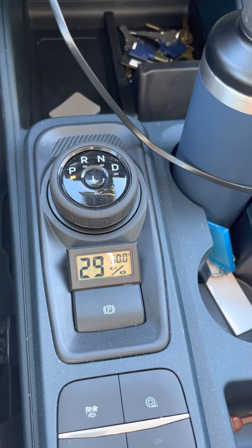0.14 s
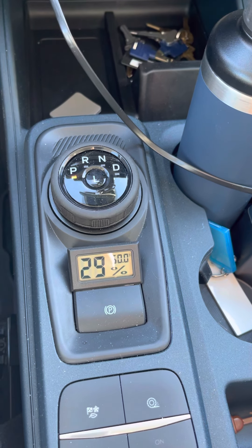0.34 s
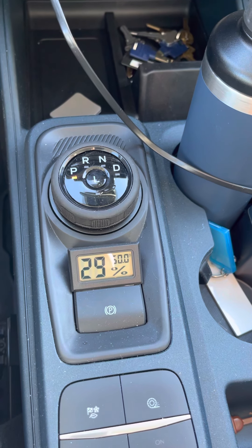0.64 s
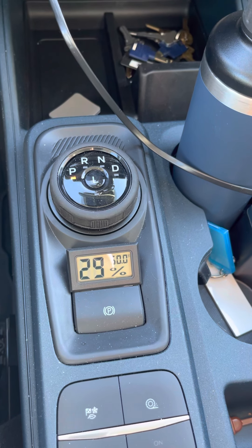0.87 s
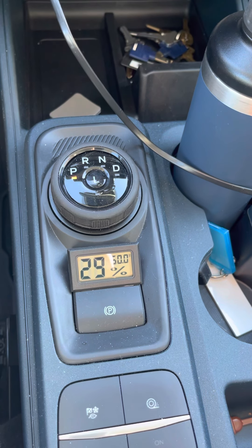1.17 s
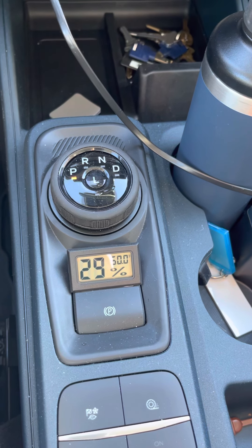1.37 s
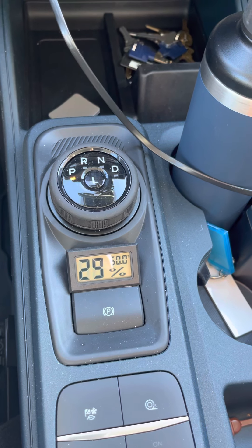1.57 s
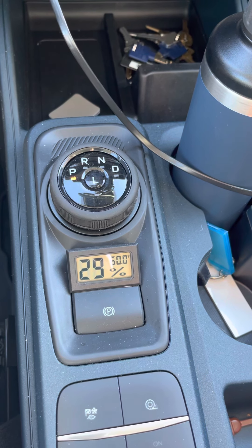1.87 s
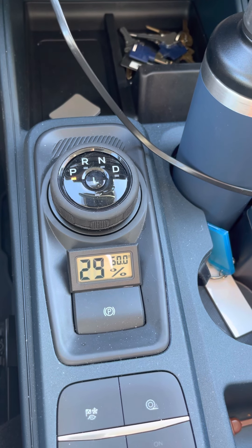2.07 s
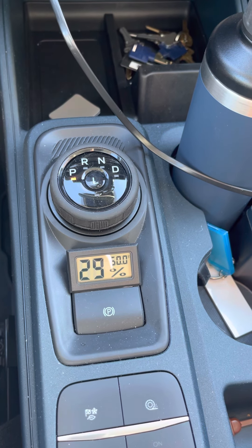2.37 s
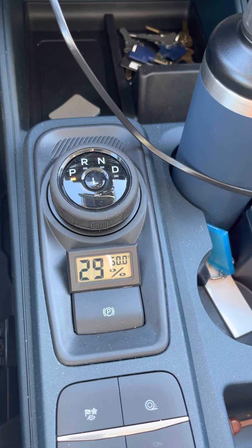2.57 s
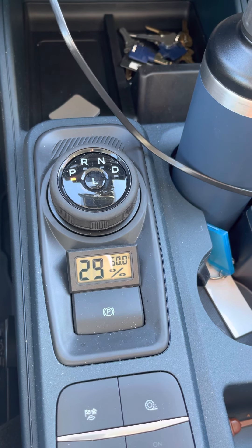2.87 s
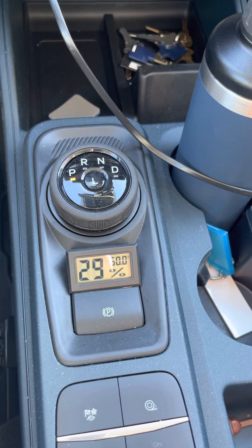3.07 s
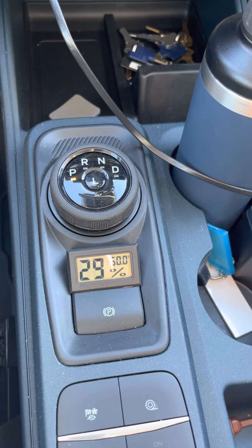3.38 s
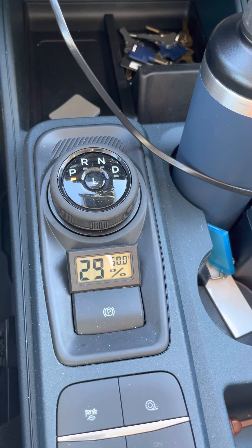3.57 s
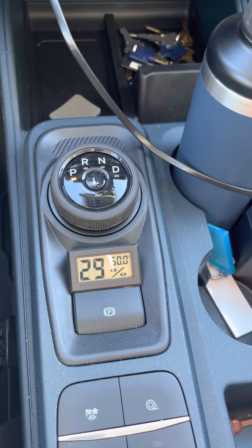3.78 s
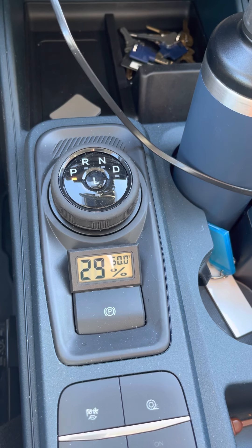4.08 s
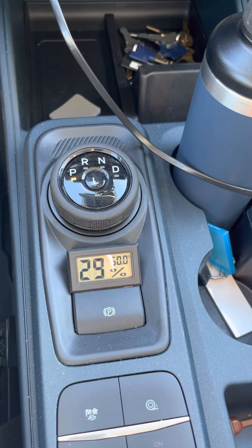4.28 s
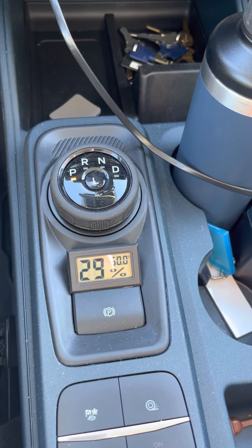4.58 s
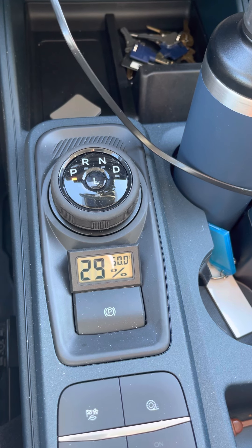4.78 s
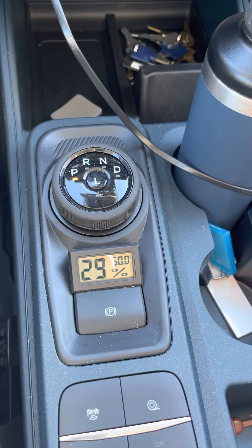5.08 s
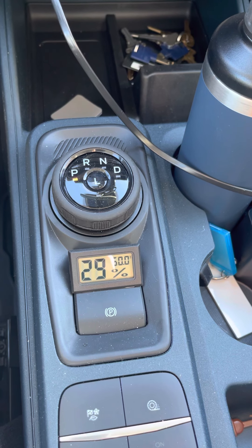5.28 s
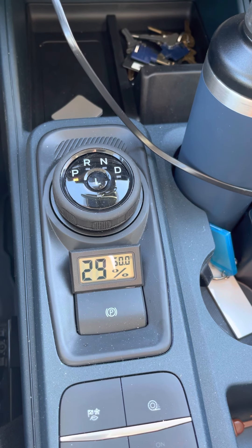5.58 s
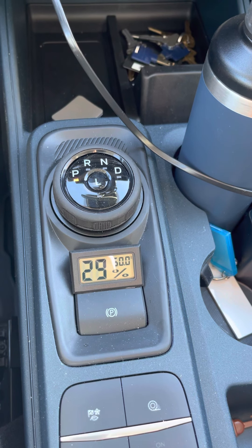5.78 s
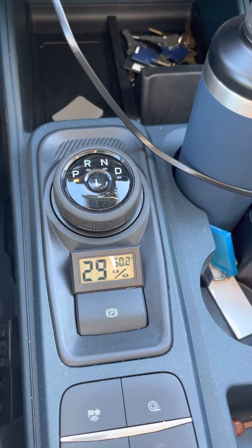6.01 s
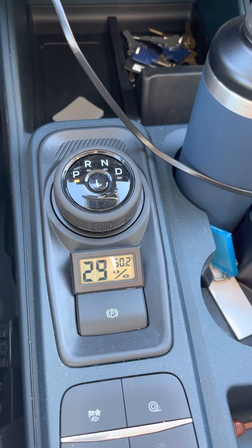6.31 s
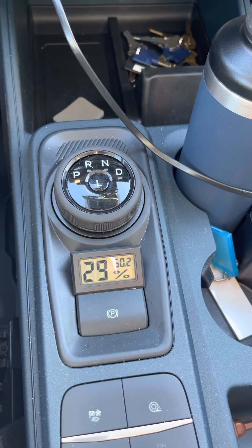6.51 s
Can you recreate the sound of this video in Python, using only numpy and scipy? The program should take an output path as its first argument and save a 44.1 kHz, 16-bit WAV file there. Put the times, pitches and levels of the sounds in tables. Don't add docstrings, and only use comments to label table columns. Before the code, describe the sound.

A constant, gusty vent roar fills a small car interior, coloured by duct resonances, dull in the extreme treble. A sharp plastic snap sets panels booming briefly and small metal parts tinkling. Afterwards a low engine hum swells quickly with a faint intake growl, then drifts down in pitch; a light tick follows, and another slightly higher rev. Picked up by a phone near the centre console.

```python
import sys
import numpy as np
from scipy import signal
from scipy.fft import rfft, irfft
from scipy.io import wavfile
from scipy.ndimage import uniform_filter1d

SR = 44100
rng = np.random.default_rng(int(sys.argv[2]) if len(sys.argv) > 2 else 0)


def transcribe(signal):
    frames = np.atleast_2d(signal).T
    limited = np.clip(frames, -1, 1)
    pcm = np.round(limited * 32767).astype(np.int16)
    wavfile.write(sys.argv[1], SR, pcm)


def ratio_of_db(decibels):
    return 10 ** (np.asarray(decibels, float) / 20)


N = 293265
T = np.arange(N) / SR
F = np.maximum(np.arange(N // 2 + 1) * SR / N, 1)

# (throttle opens [s], top firing rate [Hz], coasting from [s], boom level [dB])
REVS = [
    (1.553, 102.9, 2.02, 0),
    (4.55, 122, 5.01, 0.5),
]
IDLE_HZ, CLIMB_HZ_PER_S, COAST_PER_S = 48.9, 225, 0.545
LEAD_IN_S, LATCH_S, TICK_S = 0.18, 0.513, 4.1905


def on_log(table, column=1):
    table = np.array(table)
    return np.interp(np.log(F), np.log(table[:, 0]), table[:, column])


def walk(rate):
    hold = int(SR / rate)
    steps = np.repeat(rng.standard_normal(N // hold + 1), hold)
    return 1.41 * uniform_filter1d(uniform_filter1d(steps, hold), hold)[:N]


def noise(db_per_hz):
    return rfft(rng.standard_normal((2, N))) * ratio_of_db(db_per_hz) * np.sqrt(SR / 2)


def blower():
    # (frequency [Hz], density [dB per Hz])
    rush = [(40, -100), (130, -62.5), (170, -64), (370, -60.5), (430, -66.5), (570, -70), (1300, -74),
            (1600, -78), (2400, -81.5), (2750, -87.5), (4400, -91), (4800, -92), (7500, -98.5),
            (11000, -101)]
    # (frequency [Hz], width [Hz], level over the rush [dB])
    duct = [(247.4, 58.6, 8.5), (302.4, 32, 3.5), (403, 21.7, -10), (563, 40, -4.5), (699.5, 58, 7),
            (758, 73, -4), (990, 88, 2.5), (1002, 29, 0), (1108, 88, 4), (1190, 55, 2.5), (1297, 43, -3),
            (1482, 22, 4.5), (1530, 50, -3), (1844, 120, 1), (2100, 60, -5), (2144, 85, 3),
            (2560, 29, -1.5), (3070, 100, 2.5), (3790, 110, 3.5), (4400, 61, 6), (5000, 145, -0.5),
            (5800, 210, 2), (7030, 200, 3), (7450, 120, 0), (7820, 130, 3), (9350, 260, -2.5),
            (10800, 730, 6)]
    gust_db, flicker_db, flicker_hz = -0.5, 0.58, 14

    ring = sum(db / (1 + ((F - hz) / (width / 2)) ** 2) for hz, width, db in duct)
    ring -= 10 * np.log10(1 + (F / 11700) ** 150)
    density = on_log(rush) + ring
    air, gust, out = noise(density), walk(0.89), 0
    octave = np.clip(np.log2(F / 125), 0, 7)
    for band in range(8):
        share = np.sqrt(np.clip(1 - abs(octave - band), 0, 1))
        other = noise(density) if band % 2 else air
        level_db = gust_db * gust + flicker_db * walk(flicker_hz)
        out = out + irfft(other * share, N) * ratio_of_db(level_db)
    return out


def revving(start, top_hz, release):
    knee = 13.89
    climb = IDLE_HZ + CLIMB_HZ_PER_S * np.maximum(T - start, 0)
    coast = top_hz * np.exp(-COAST_PER_S * (T - release))
    hz = (climb ** -knee + top_hz ** -knee + coast ** -knee) ** (-1 / knee)
    lift = start + (top_hz - IDLE_HZ) / CLIMB_HZ_PER_S
    opening = np.clip((T - start + LEAD_IN_S) / LEAD_IN_S, 0, 1)
    throttle = opening * np.exp(-np.maximum(T - lift, 0) / 0.14)
    return hz, throttle, lift


def rumble():
    # (frequency [Hz], density [dB per Hz])
    buffeting = [(20, -62), (32, -63), (50, -56.5), (65, -49), (85, -51.5), (115, -53), (140, -67.5),
                 (200, -72), (500, -170)]
    swell_db, swell_hz, load_db = 1, 2.87, 4.5
    load = sum(revving(*rev[:3])[1] for rev in REVS)
    level_db = swell_db * walk(swell_hz) + load_db * load
    return irfft(noise(on_log(buffeting)), N) * ratio_of_db(level_db)


def blow(start, rise, t60):
    t = np.maximum(T - start, 0)
    return (1 - np.exp(-(t / rise) ** 2)) * np.exp(-np.log(1000) * t / t60)


def burst(hz, width, db):
    band = irfft(noise(0) / (1 + ((F - hz) / (width / 2)) ** 4), N)
    return band / band.std() * ratio_of_db(db)


def crack(start, bands):
    out = np.zeros((2, N))
    for hz, width, db, t60 in bands:
        out += burst(hz, width, db) * blow(start, 0.0005 + 2.1 / hz, t60)
    return out


def latch():
    # (centre [Hz], width [Hz], level [dB], t60 [s])
    bands = [(4070, 8900, -29.5, 0.058), (5500, 1200, -32, 0.043), (3150, 2100, -29.5, 0.064),
             (1560, 390, -29.5, 0.086), (815, 700, -32, 0.099), (11100, 3000, -38.5, .03),
             (8900, 1800, -38.5, 0.055)]
    return crack(LATCH_S, bands)


def panels():
    # (lag after latch [s], frequency [Hz], level [dB], t60 [s])
    thuds = [
        (.006, 111.3, -7, 0.15),
        (.005, 205, -19, 0.27),
        (.007, 333, -24.5, 0.17),
        (.015, 160, -31, .2),
        (.037, 65.2, -10, 0.33),
        (.09, 255, -21.5, .1),
        (.09, 124.4, -16, 0.11),
        (0.219, 58.5, -22, .3),
    ]
    out = np.zeros(N)
    for lag, hz, db, t60 in thuds:
        start = LATCH_S + lag
        out += ratio_of_db(db) * blow(start, 1.27 / hz, t60) * np.sin(2 * np.pi * hz * (T - start))
    return out


def jingle():
    # (time [s], level [dB], rise [s], t60 [s])
    jingles = [
        (.520, -43, .002, 0.098),
        (.55, -46, 0.018, 0.14),
    ]
    out = np.zeros((2, N))
    for start, db, rise, t60 in jingles:
        out += burst(11100, 1700, db) * blow(start, rise, t60)
    return out


def engine():
    # (frequency [Hz], coasting level [dB], change under throttle [dB])
    floor = [(45, -42, 12), (57, -34.5, -1), (66, -26, 1.5), (75.3, -32.5, 4.5), (84, -34.5, 2),
             (91.2, -24.5, -0.5), (102.4, -21, -9.5), (121, -23, -6)]
    # (multiple of the firing rate, level [dB])
    partials = [(1.5, -25), (2, -6), (2.5, -4), (3, -3.5), (3.5, -11), (4, -4)]
    half_idle_db, half_db_per_octave = -52, 12
    jolt_db, jolt_s = 14, 0.025
    growl_shut_db, growl_open_db = -57, -41
    fade_s = 0.1

    out = np.zeros(N)
    gulp = irfft(noise(0)[0] / (1 + ((F - 340) / 190) ** 4), N)
    gulp /= gulp.std()
    floor_hz, *columns = np.transpose(floor)
    for start, top_hz, release, rev_db in REVS:
        hz, throttle, lift = revving(start, top_hz, release)
        phase = 2 * np.pi * np.cumsum(hz * (1 + 0.003 * walk(24.77))) / SR

        coast_db, load_db = (np.interp(np.log(hz), np.log(floor_hz), c) for c in columns)
        boom_db = rev_db + coast_db + load_db * throttle
        boom = ratio_of_db(boom_db + 1.64 * walk(20)) * np.sin(phase)

        jolt = jolt_db * np.exp(-((T - lift) / jolt_s) ** 2)
        half_db = half_idle_db + half_db_per_octave * np.log2(hz / IDLE_HZ) + jolt
        half = ratio_of_db(half_db) * np.sin(phase / 2)

        growl = sum(ratio_of_db(db + 5.1 * walk(40)) * np.sin(k * phase + 1.3 * walk(30)) for k, db in partials)
        growl += ratio_of_db(-6.5) * gulp * (1 + 0.32 * np.sin(phase))
        growl_db = growl_shut_db + (growl_open_db - growl_shut_db) * throttle

        tone = boom + half + ratio_of_db(growl_db) * growl
        idle_again = release + np.log(top_hz / IDLE_HZ) / COAST_PER_S
        fade_in = np.clip((T - start + LEAD_IN_S) / fade_s, 0, 1)
        fade_out = np.clip((idle_again + fade_s - T) / fade_s, 0, 1)
        out += np.sqrt(2) * tone * fade_in * fade_out
    return np.array([out, 2.2 * np.roll(out, 60)])


def tick():
    # (centre [Hz], width [Hz], level [dB], t60 [s])
    bands = [(4500, 7500, -41, .04), (3570, 900, -40, .04), (2200, 1600, -39, .04),
             (10900, 1800, -47, .035)]
    return crack(TICK_S, bands)


def ports(direct, scattered):
    # (frequency [Hz], likeness [0-1], left lead [rad], left minus right [dB])
    field = [(60, .9998, 0, 0), (120, .9995, 0, .25), (300, .985, -.03, 1.5), (400, .93, -.1, 1.8),
             (560, .55, -.1, 3), (700, .9, -.4, 5.5), (900, .5, -.7, 3), (1000, .62, -1, -2),
             (1150, .83, -.3, 2.5), (1270, .5, -.6, 3.5), (1450, .82, -.2, -.5), (1800, .975, 0, .3),
             (2100, .85, .2, 1), (2450, .8, .4, 1.5), (2800, .3, 1.8, 0), (3050, .5, -.3, 3),
             (3450, .15, .3, -1), (3750, .55, 1.2, -3.5), (4200, .68, 1.8, 2), (4550, .4, 1.8, 4),
             (4880, .94, 3.14, 0), (5300, .85, 5.2, 1.3), (5750, .98, 6.1, .3), (6200, .985, 0, 0),
             (7000, .88, 0, 0), (7900, .9, 0, 0), (8400, .98, 0, 0), (9600, .98, 0, 0), (10200, .86, 0, 0),
             (11500, .84, 0, 0)]
    lag_s, lag_from_hz = 1 / 6000, 5750
    like = on_log(field)
    common = rfft(direct) * np.sqrt((1 + like) / 2)
    differ = rfft(scattered) * np.sqrt((1 - like) / 2)
    lead = np.where(F < lag_from_hz, on_log(field, column=2), 2 * np.pi * F * lag_s)
    turn = np.exp(0.5j * lead) * ratio_of_db(on_log(field, column=3) / 2)
    return irfft(np.array([(common + differ) * turn, (common - differ) / turn]), N)


def scene():
    knocks = latch() + panels() + jingle() + tick()
    return ports(*(blower() + rumble() + engine() + knocks))


def band_limit(x):
    return signal.sosfilt(signal.butter(12, 13010, fs=SR, output="sos"), x)


def record(dry):
    trimmed = signal.sosfilt(signal.butter(2, 35, "high", fs=SR, output="sos"), dry)
    return band_limit(trimmed)


dry = scene()
out = record(dry)
transcribe(out)
```